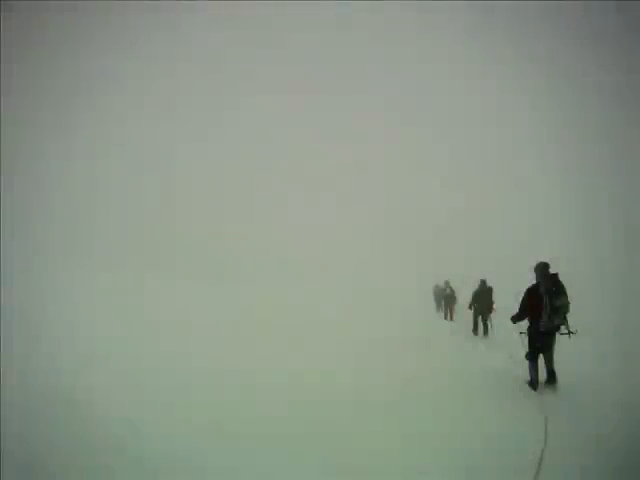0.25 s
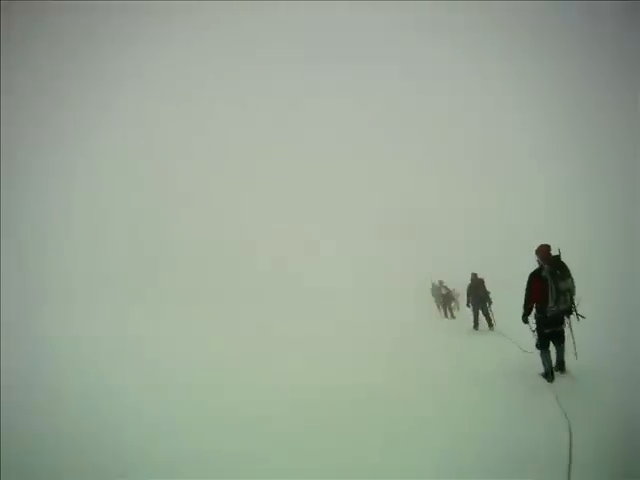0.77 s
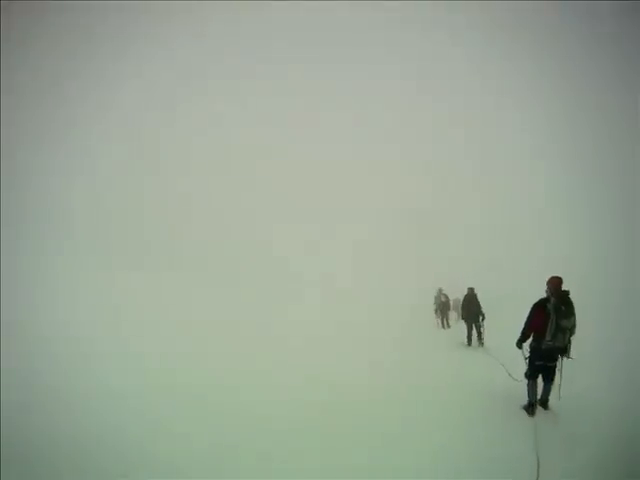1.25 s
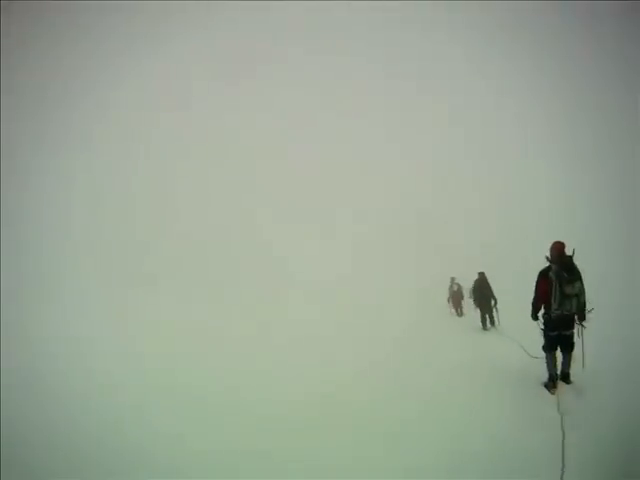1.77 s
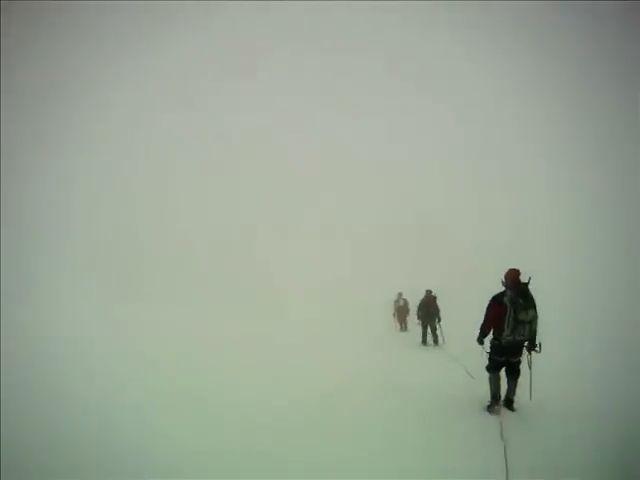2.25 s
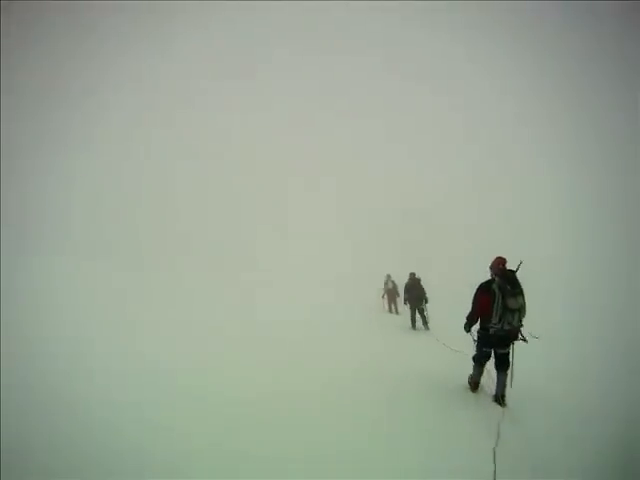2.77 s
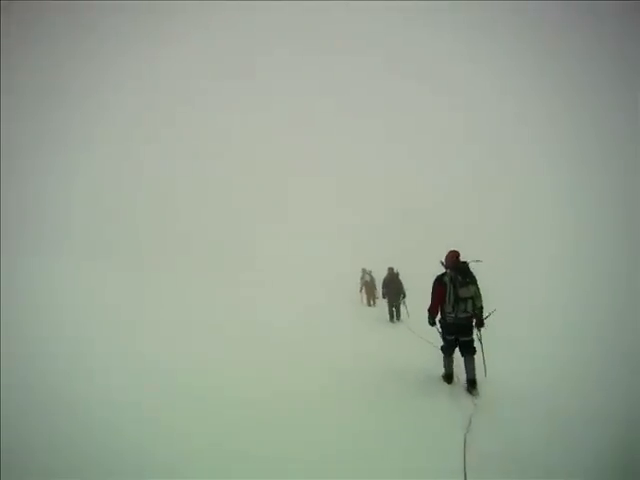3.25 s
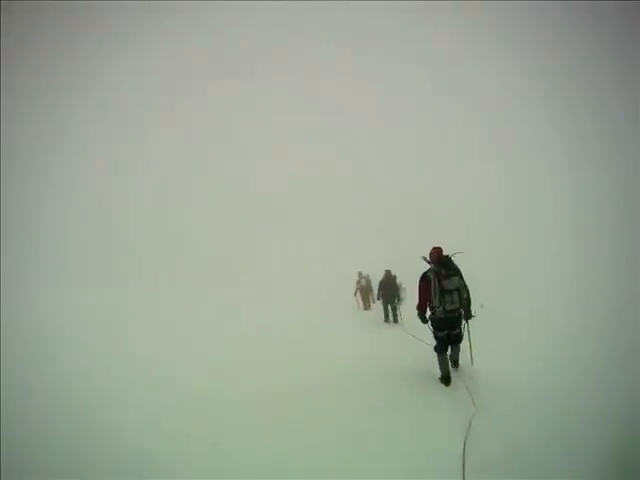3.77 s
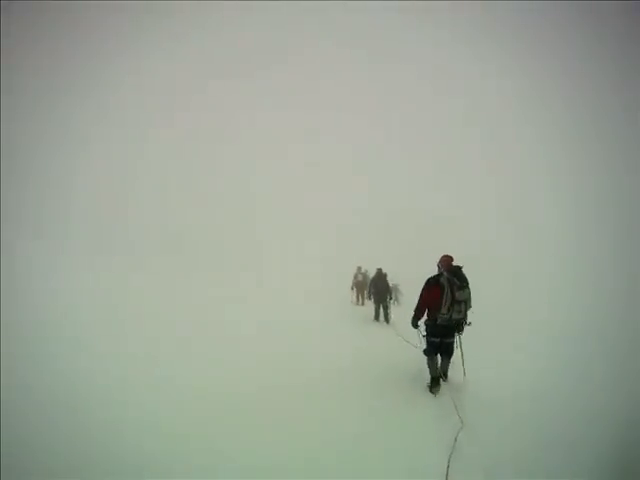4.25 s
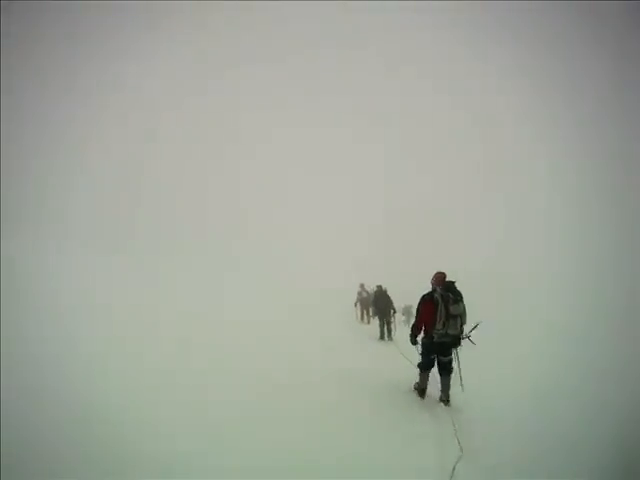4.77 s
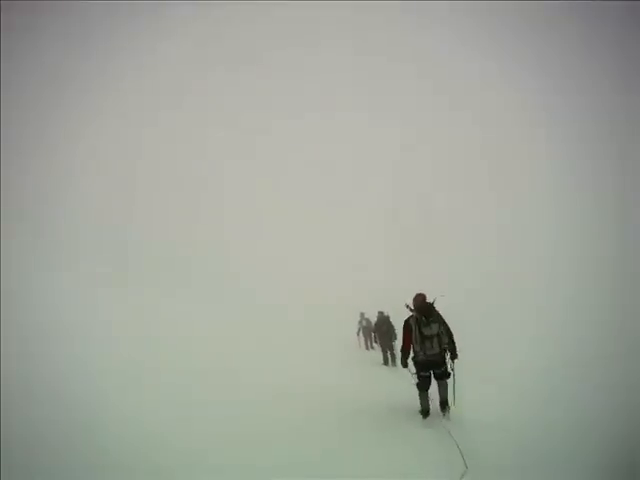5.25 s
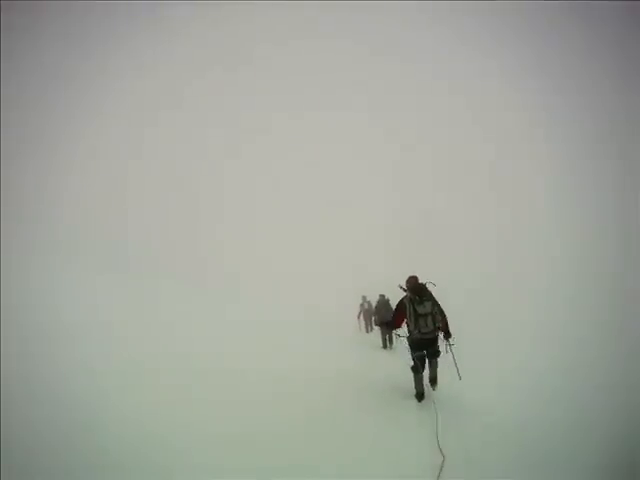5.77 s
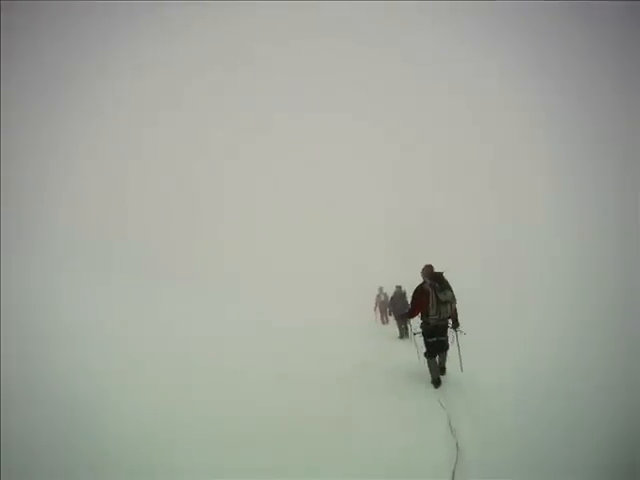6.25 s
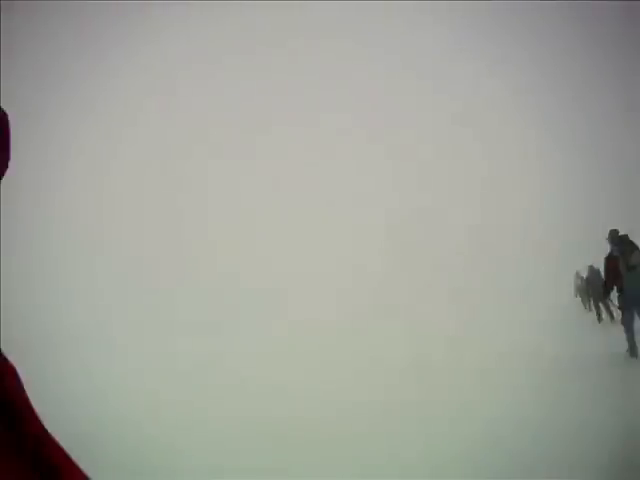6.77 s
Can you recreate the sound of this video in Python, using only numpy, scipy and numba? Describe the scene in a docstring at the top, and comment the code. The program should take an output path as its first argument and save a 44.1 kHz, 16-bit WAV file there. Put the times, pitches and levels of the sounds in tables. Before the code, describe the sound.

Close, rough wind buffeting outdoors on a foggy snow slope. Bassy thuds and fluttering roar dominate, dull overall, with a faint high sizzle. The wind dips for moments around two and three seconds, then surges with brighter rushing bursts after three and a half, and again in a broad ripping gust near the end. Peaks sound squashed by the small microphone's automatic level.

```python
"""Gale across a camera microphone

A gale on an open snow slope blows straight across the microphone port of a small camera.
Noise bands that follow the wind make a rumble, a roar and a tearing hiss; a thin sizzle lies on top.
The biggest eddies are single pressure swings that thump the diaphragm.
Loud peaks make the camera's gain control duck, then creep back. The sound cuts in abruptly."""
import sys
import numpy as np
from scipy import signal
from scipy.io import wavfile
from numba import njit

SR = 44100
rng = np.random.default_rng(int(sys.argv[2]) if len(sys.argv) > 2 else 0)


def unload_audio(sound):
    """Save the sound as a 16-bit wav file, at the path given as the first command line argument."""
    columns = np.transpose(np.atleast_2d(sound))
    # keep every value between -1 and 1, then stretch to whole-number steps
    steps = np.round(np.clip(columns, -1, 1) * 32767)
    wavfile.write(sys.argv[1], SR, steps.astype(np.int16))


N = 308964

# Slow strength of the wind at the port, by eddy size, as relative levels.
# Columns: time_s [s], hiss_db [dB], rush_db [dB], roar_db [dB]
WIND_STRENGTH = [(0.42, -3, 0.5, 2), (0.92, 0, -0.5, -2), (1.42, -3.5, 1.5, 3), (1.72, -0.5, -1.5, -2),
                 (2.1, -7, -5.5, -6.5), (2.27, 0, -0.5, -1.5), (2.62, -2, -2, -1), (3.02, -7, -6, -6),
                 (3.2, 0, -2, -1), (3.58, 7, 1.5, 3.5), (3.99, -0.5, -1.5, -3), (4.19, 5.5, 5, 2),
                 (4.4, 0, -0.5, 1.5), (4.8, -1.5, -0.5, 1.5), (5.55, 0, -1, 1), (6.28, 3, 3, 4.5),
                 (6.58, -6.5, -4, -4), (7.0, -2, -2.5, 0)]
# How steeply the fine eddies grow with the wind.
# Columns: pitch_hz [Hz], growth [dB per dB of hiss]
FINE_EDDY_GROWTH = [(2800, 1.0), (5000, 1.5), (6800, 1.56), (9000, 0.91)]


def from_db(db):
    """Turn decibels into a plain multiplier."""
    return 10 ** (np.asarray(db) / 20)


def rms_one(x):
    """Scale a signal so that its average strength (RMS) is 1."""
    return x / np.sqrt(np.mean(x ** 2) + 1e-20)


def in_time(rows):
    """Read each column of a time table at every sample, joining the points by straight lines."""
    time_s, *columns = np.transpose(rows)
    return [np.interp(np.arange(N) / SR, time_s, column) for column in columns]


def at_hz(points, hz):
    """Read a curve of (Hz, value) points at one pitch, on a log-frequency axis."""
    point_hz, value = np.transpose(points)
    return np.interp(np.log(hz), np.log(point_hz), value)


def drift(rate_hz):
    """Smooth random wandering, about rate_hz changes a second: noise smoothed by a low-pass filter."""
    # Worked out at a tenth of the sample rate; the first 4000 values let the filter settle.
    pole = np.exp(-20 * np.pi * rate_hz / SR)
    noise = rng.standard_normal(N // 10 + 4002)
    slow = signal.lfilter([1], [1, -2 * pole, pole * pole], noise)[4000:]
    return np.interp(np.arange(N) / 10, np.arange(len(slow)), rms_one(slow))


def noise_bands(low_hz, high_hz, count):
    """Neighbouring bands of unrelated noise, equally strong per Hz: (centre Hz, sound)."""
    edges_hz = np.geomspace(low_hz, high_hz, count + 1)
    for low, high in zip(edges_hz, edges_hz[1:]):
        band_filter = signal.butter(3, [low, high], "band", fs=SR, output="sos")
        band = signal.sosfilt(band_filter, rng.standard_normal(N))
        yield np.sqrt(low * high), rms_one(band) * np.sqrt(high - low)


def turbulence(rumble_db, roar_db, rush_db, hiss_db, flutter, flutter_db, patchy_db):
    """Eddies of many sizes: each noise band follows those of its size; finer ones burst together."""
    # Colour of the turbulence. Columns: pitch_hz [Hz], level_db [relative dB per Hz]
    eddy_colour = [(20, -4), (32, -2.5), (60, 1.5), (130, 0.2), (200, -4.5), (260, -6), (500, -9),
                   (780, -18.5), (1200, -23), (2000, -28.5), (2800, -31), (3750, -42.5), (4400, -47),
                   (5800, -56.5)]
    # Eddy size by pitch: 0 rumble, 1 roar, 2 rush, 3 hiss; values between blend two neighbours
    size_by_hz = [(150, 0), (300, 1), (520, 1), (950, 2), (1300, 2), (2400, 3)]
    # Share of the common flutter that each pitch takes
    flutter_share = [(70, 0.3), (300, 0.81), (1000, 0.99), (5000, 0.99)]
    out = 0
    for hz, band in noise_bands(18, 6000, count=36):
        size = at_hz(size_by_hz, hz)
        eddies_db = (rumble_db, roar_db, rush_db, at_hz(FINE_EDDY_GROWTH, hz) * hiss_db)
        wind_db = sum(max(1 - abs(size - k), 0) * db for k, db in enumerate(eddies_db))
        level = from_db(at_hz(eddy_colour, hz) + wind_db)
        bursts_db = at_hz(flutter_share, hz) * flutter_db * flutter
        own_patches_db = patchy_db * drift(20.7)
        out = out + band * level * rms_one(from_db(bursts_db + own_patches_db))
    return out


def thin_depths(wind, hiss_db):
    """Faster wind makes smaller eddies: the deepest rumble sinks as the hiss grows, and swells in a lull."""
    low_pass = signal.butter(1, 64, fs=SR, output="sos")
    deep = signal.sosfilt(low_pass, wind)
    return wind + deep * (from_db(-hiss_db) - 1)


def gust_lift(hz):
    """Short gusts lift the eddies around one pitch (in dB), swelling and dropping as lopsided bells."""
    # Columns: crest_s [s], length_s [s], lift_db [dB], pitch_hz [Hz], spread_octaves [octaves]
    gusts = [(0.514, 0.11, 0, 700, 1.8), (0.775, 0.099, 3, 1200, 1.1), (1.654, 0.1, 4, 900, 1.2),
             (1.828, 0.066, 9.5, 900, 2.7), (1.96, 0.093, 6, 2000, 2.4), (2.118, 0.016, 11.5, 400, 1.1),
             (2.444, 0.024, 1.5, 500, 1.5), (2.78, 0.12, 4.5, 1300, 2.6), (3.624, 0.17, 6.5, 1700, 1.05),
             (3.861, 0.059, 11, 1170, 2.5), (4.284, .07, 3, 1100, 0.77), (4.431, 0.05, 8, 1200, 2.4),
             (4.638, 0.3, 3.5, 4000, 1.6), (5.12, 0.14, 4, 5000, 1.8), (5.31, 0.16, 3, 500, 2.4),
             (5.95, 0.098, 3, 400, 0.73), (6.645, 0.041, 8.5, 5000, 1.8), (6.766, 0.17, 14, 1590, 1.5),
             (6.885, 0.065, 7, 1300, 1.3)]
    rise_share = 0.41  # share of a gust's length spent building up to the crest
    lift_db = np.zeros(N)
    for crest_s, length_s, crest_db, pitch_hz, spread_octaves in gusts:
        t = np.arange(N) / SR - crest_s
        phase = t / (length_s * np.where(t < 0, rise_share, 1 - rise_share))
        near = np.abs(phase) < 4
        pitch_distance = np.log2(hz / pitch_hz) / spread_octaves
        lift_db[near] += crest_db * np.exp(-phase[near] ** 2 - pitch_distance ** 2 / 2)
    return lift_db


def airflow():
    """Wind drives every eddy size: levels in dB of rumble, roar, rush and hiss, slow wind plus gusts."""
    # Centre pitches [Hz] of rumble, roar, rush and hiss
    eddy_hz = (100, 420, 1100, 5000)
    hiss_db, rush_db, roar_db = in_time(WIND_STRENGTH)
    # The large eddies swing less: 0.6 of the mean swing of roar and hiss
    rumble_db = 0.08 + 0.6 * (roar_db + hiss_db) / 2
    steady_db = (rumble_db, roar_db, rush_db, hiss_db)
    return [db + gust_lift(hz) for db, hz in zip(steady_db, eddy_hz)]


def buffets(wake_depth, wake_radians):
    """A big eddy sucks, then pushes, inside a longer low-pressure wake; also how far it covers the port."""
    # Single big eddies hitting the port.
    # Columns: time_s [s], swing_db [dB, peak of the swing before the wake's suction], pitch_hz [Hz]
    big_eddies = [(0.6, 1.5, 98), (0.83, -4.5, 114), (0.983, -9, 108), (1.137, -3.5, 103),
                  (1.302, -5.5, 151), (1.368, -6.5, 130), (1.431, -2, 101), (1.541, -5.5, 107),
                  (1.682, -3, 123), (1.835, -1.5, 101), (1.963, -2.5, 83), (2.124, -3, 94),
                  (2.301, -2.5, 70.6), (2.453, -2.5, 162), (2.689, -4, 81.5), (2.772, -7.5, 100),
                  (2.851, -4, 106), (2.96, -7, 109), (3.117, -9, 102), (3.248, -7, 132), (3.349, -6, 118),
                  (3.43, -2, 120), (3.645, -7.5, 158), (3.735, -6, 119), (3.852, -4, 144), (3.912, -5, 112),
                  (4.303, -6.5, 142), (4.435, 4, 100), (4.719, -4, 128), (4.794, -12, 122),
                  (4.894, -11.5, 143), (5.073, -10, 106), (5.2, -7, 103), (5.421, -3, 130), (5.507, -5, 73),
                  (5.815, -6.5, 120), (6.048, -2, 80.5), (6.192, -6.5, 103), (6.373, 1, 106),
                  (6.817, -2.7, 77)]
    pressure, cover = np.zeros(N), np.zeros(N)
    for time_s, swing_db, hz in big_eddies:
        turn = 2 * np.pi * hz * (np.arange(N) / SR - time_s)  # radians from the middle of the eddy
        near = np.abs(turn) < 20
        turn = turn[near]
        swing = turn * np.exp((1 - turn ** 2) / 2)
        suction = wake_depth * np.exp(-(turn / wake_radians) ** 2 / 2)
        pressure[near] += from_db(swing_db) * (swing - suction)
        cover[near] += np.exp(-(turn / np.pi) ** 2 / 2)
    return pressure, np.minimum(cover, 1)


def sizzle(hiss_db, flutter, flutter_db):
    """The finest eddies excite the port's cavity: thin, high noise that follows the hiss and flutters."""
    # Colour of the sizzle. Columns: pitch_hz [Hz], level_db [relative dB per Hz]
    cavity_colour = [(5800, -31), (6800, -9.5), (7700, -6.5), (8500, -2), (9500, 0.5), (11000, 3.5)]
    air = 0
    for hz, band in noise_bands(6000, 12000, count=8):
        level_db = at_hz(cavity_colour, hz) + at_hz(FINE_EDDY_GROWTH, hz) * hiss_db
        air = air + band * from_db(level_db)
    return air * rms_one(from_db(flutter_db * flutter))


def scene():
    """Wind noise, thumps and sizzle, added together as they reach the diaphragm."""
    rumble_db, roar_db, rush_db, hiss_db = airflow()
    thumps, cover = buffets(wake_depth=0.27, wake_radians=1.7)
    flutter = rms_one(drift(19.7) + 1.04 * drift(79))
    # A big eddy pushes other large ones aside and sheds fine ones of its own
    rumble_db = rumble_db - 4 * cover
    rush_db = rush_db + 2 * cover
    hiss_db = hiss_db + 2 * cover
    wind = turbulence(rumble_db, roar_db, rush_db, hiss_db, flutter, flutter_db=1.5, patchy_db=1.47)
    slow_hiss_db = in_time(WIND_STRENGTH)[0]  # without the gusts
    wind = thin_depths(wind, slow_hiss_db)
    top = sizzle(hiss_db, flutter, flutter_db=1.5)
    return (from_db(-40) * wind + from_db(-84) * top + thumps)[None]


def bell(x, hz, width_hz, gain_db):
    """A resonance that lifts or hollows one narrow band."""
    peak = signal.lfilter(*signal.iirpeak(hz, hz / width_hz, fs=SR), x)
    return x + (from_db(gain_db) - 1) * peak


@njit
def gain_control(x, ceiling, attack_s, release_db_per_s):
    """Output over the ceiling turns the gain down quickly; it recovers at a steady pace in dB."""
    out, cut_db = np.zeros(len(x)), 0.
    for i in range(len(x)):
        out[i] = x[i] * 10 ** (-cut_db / 20)
        if abs(out[i]) > ceiling:
            over_db = 20 * np.log10(abs(out[i]) / ceiling)
            cut_db += over_db / (attack_s * SR)
        cut_db = max(cut_db - release_db_per_s / SR, 0.)
    return out


def record(dry):
    """Housing colour, gain control, rounded peaks, a narrow gap in the treble and cuts at both ends."""
    # Resonances of the housing. Columns: pitch_hz [Hz], width_hz [Hz], gain_db [dB]
    housing = [(2320, 360, -2.5), (2890, 120, 1.5), (3075, 480, -5), (3830, 920, 4), (4230, 760, -4),
               (8360, 160, 6.5), (8520, 350, -2.5), (9300, 320, 2.5)]
    # Edges [Hz] of a narrow, nearly silent band
    gap_hz = (5640, 6400)
    start_s, fade_in_s = 0.4195, 0.003
    x = dry[0] * np.clip((np.arange(N) / SR - start_s) / fade_in_s, 0, 1)
    x = signal.sosfilt(signal.butter(1, 14, "high", fs=SR, output="sos"), x)
    for hz, width_hz, gain_db in housing:
        x = bell(x, hz, width_hz, gain_db)
    x = gain_control(x, from_db(-10.5), attack_s=0.0034, release_db_per_s=62.5)
    x = x / (1 + (x / 0.85) ** 6) ** (1 / 6)  # peaks round off towards 0.85
    x = signal.sosfilt(signal.butter(4, gap_hz, "bandstop", fs=SR, output="sos"), x)
    steep_cut = signal.ellip(14, 0.2, 80, 10810, fs=SR, output="sos")  # removes the treble above 10810 Hz
    return signal.sosfilt(steep_cut, x)[None]


dry = scene()
out = record(dry)
unload_audio(out)
```